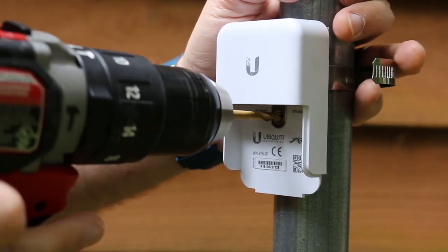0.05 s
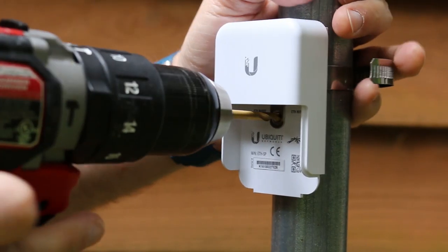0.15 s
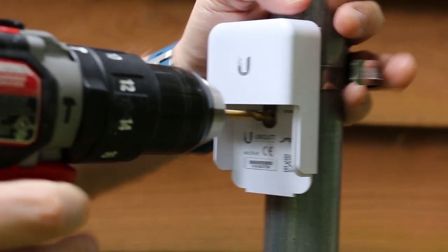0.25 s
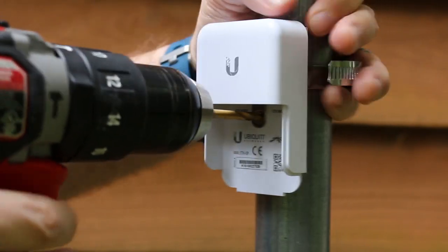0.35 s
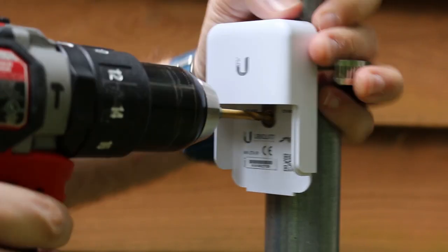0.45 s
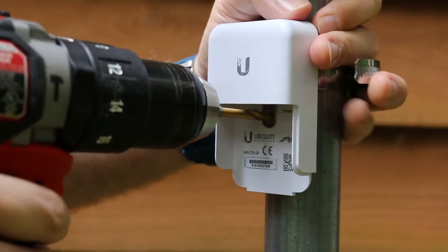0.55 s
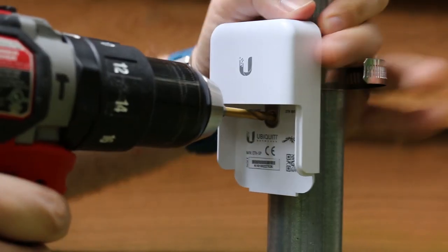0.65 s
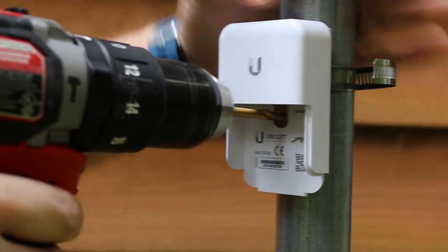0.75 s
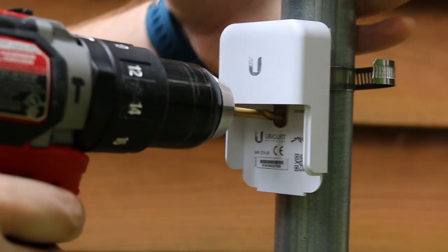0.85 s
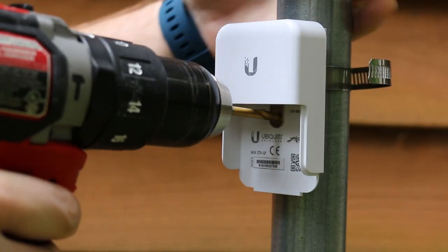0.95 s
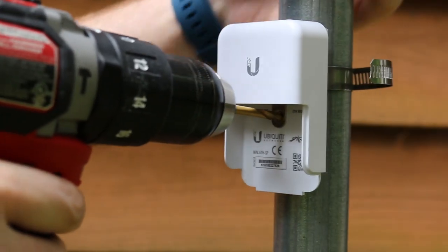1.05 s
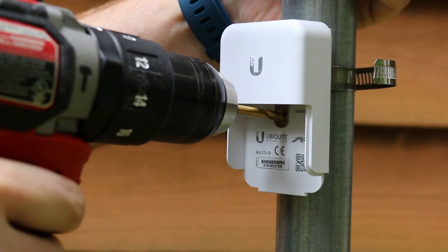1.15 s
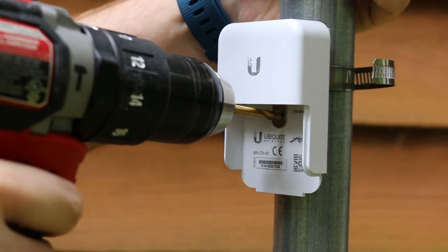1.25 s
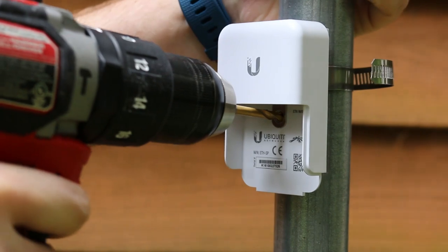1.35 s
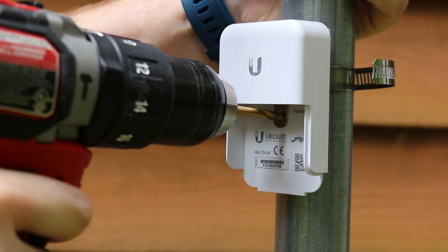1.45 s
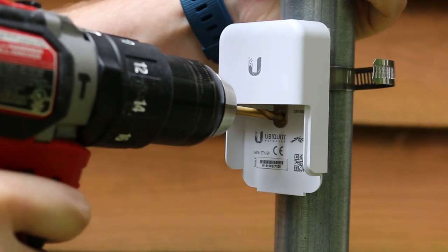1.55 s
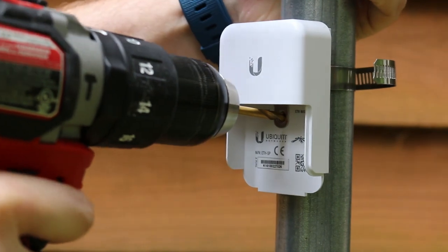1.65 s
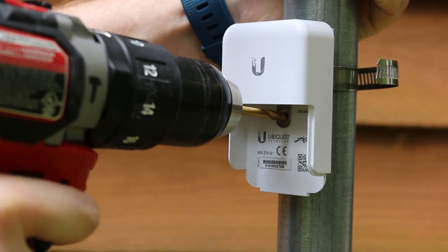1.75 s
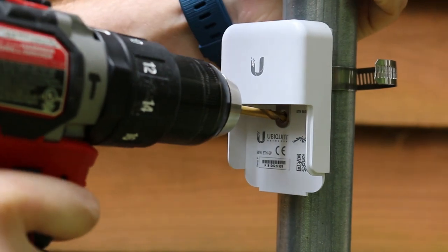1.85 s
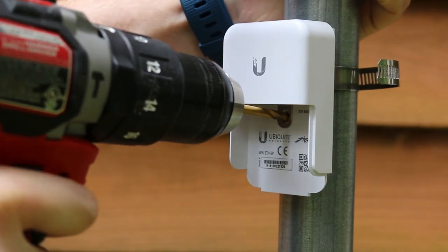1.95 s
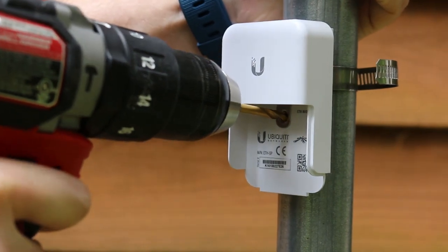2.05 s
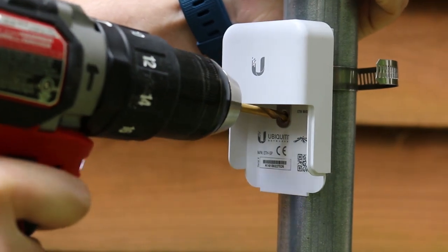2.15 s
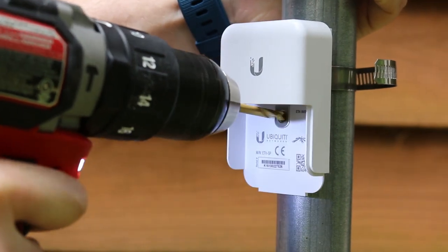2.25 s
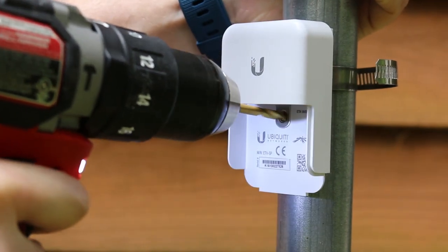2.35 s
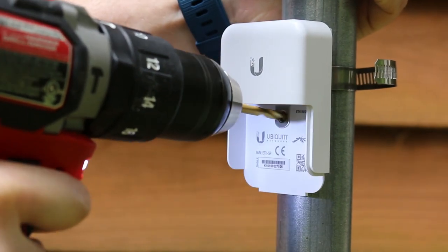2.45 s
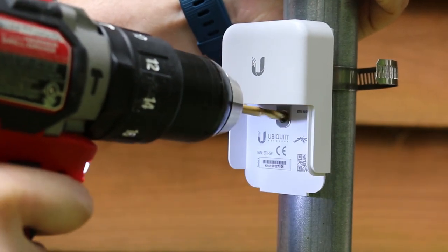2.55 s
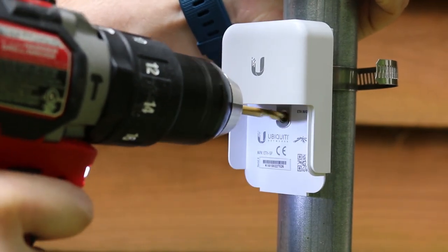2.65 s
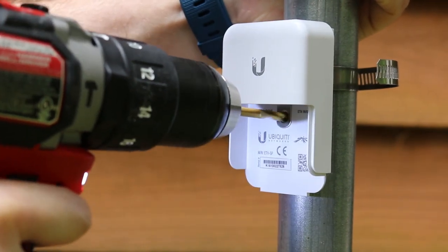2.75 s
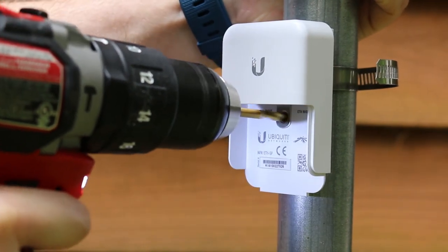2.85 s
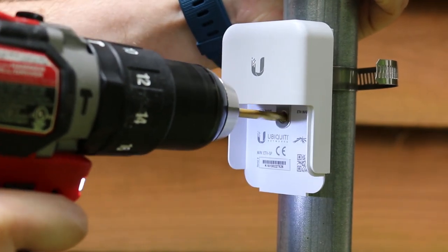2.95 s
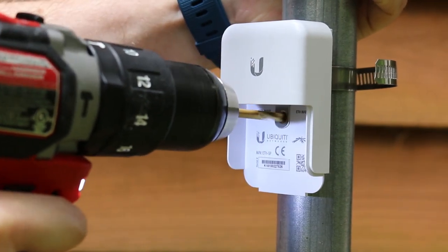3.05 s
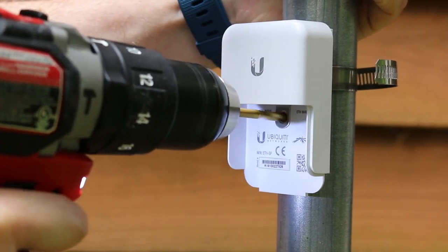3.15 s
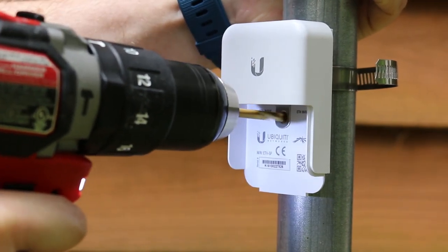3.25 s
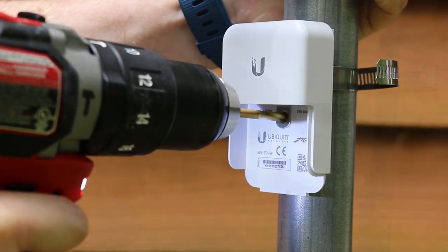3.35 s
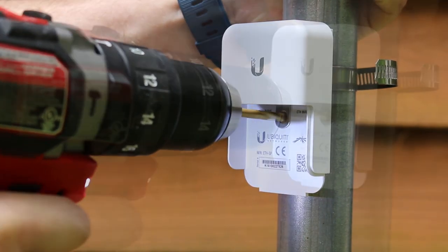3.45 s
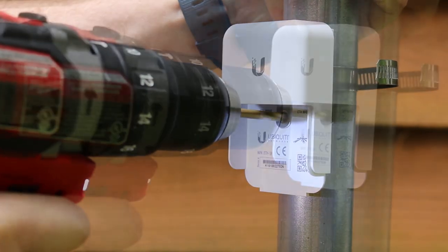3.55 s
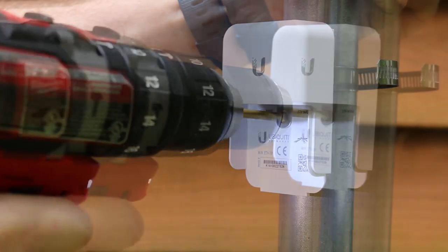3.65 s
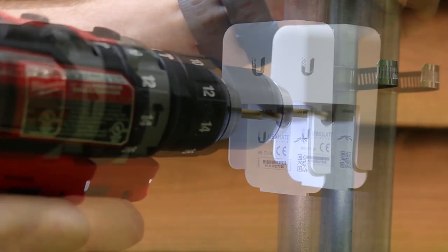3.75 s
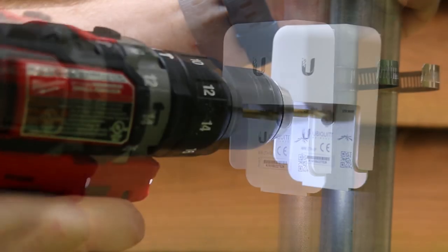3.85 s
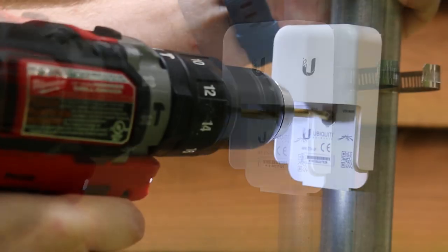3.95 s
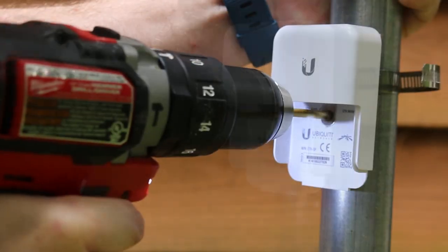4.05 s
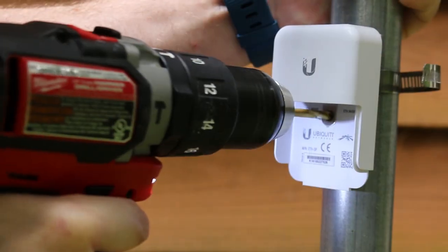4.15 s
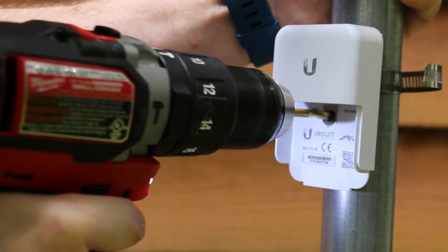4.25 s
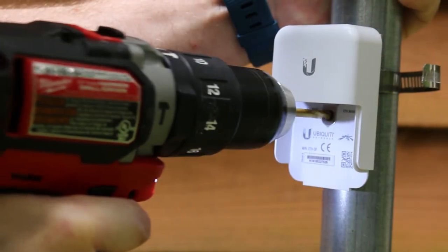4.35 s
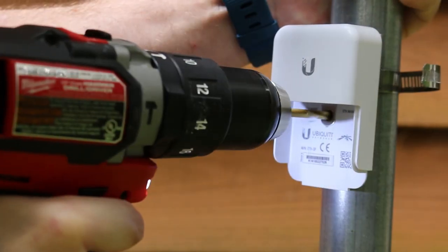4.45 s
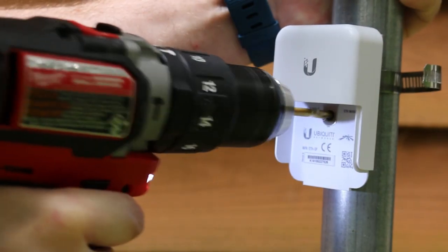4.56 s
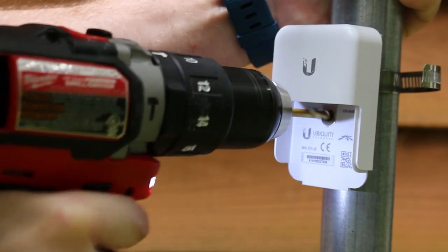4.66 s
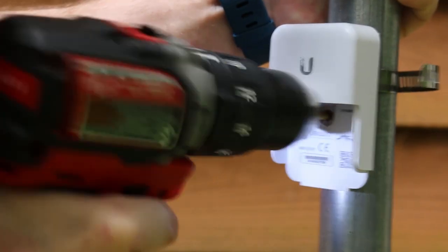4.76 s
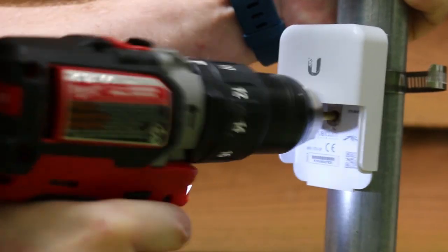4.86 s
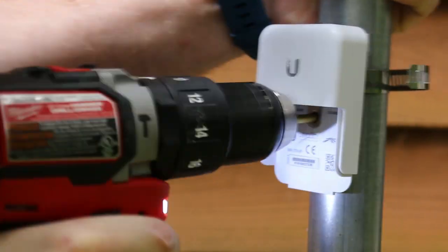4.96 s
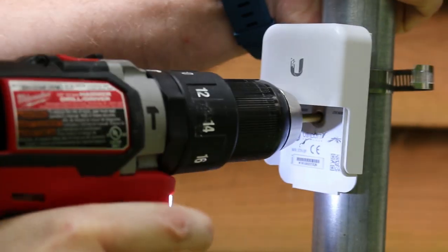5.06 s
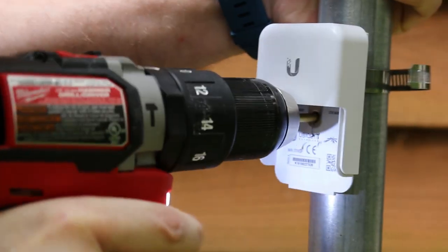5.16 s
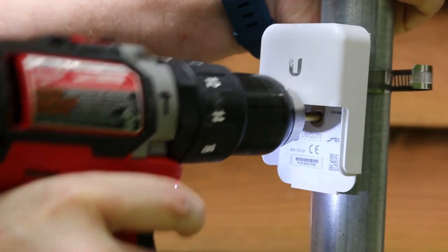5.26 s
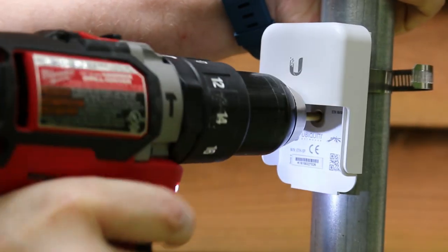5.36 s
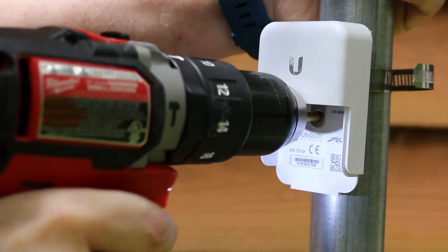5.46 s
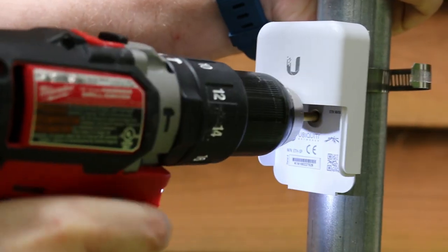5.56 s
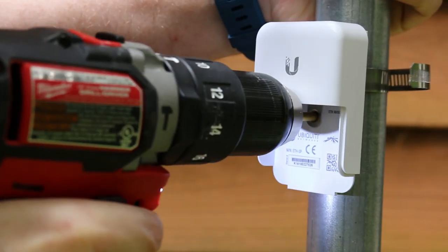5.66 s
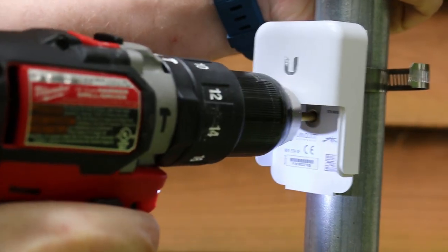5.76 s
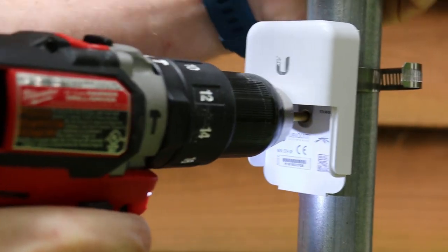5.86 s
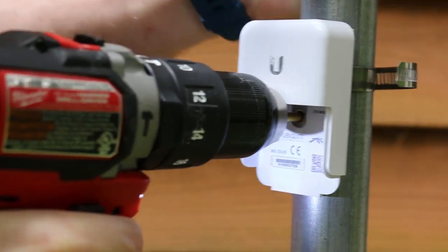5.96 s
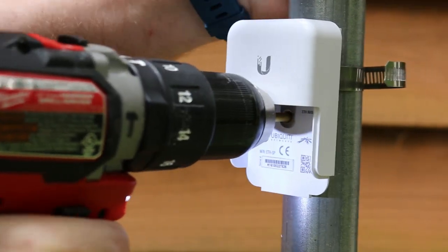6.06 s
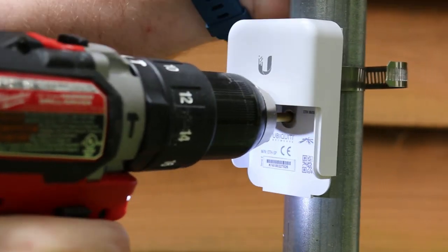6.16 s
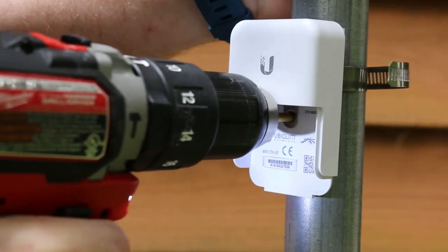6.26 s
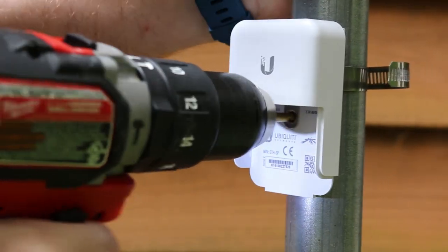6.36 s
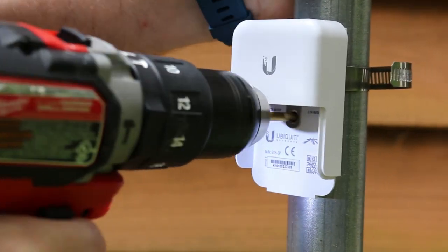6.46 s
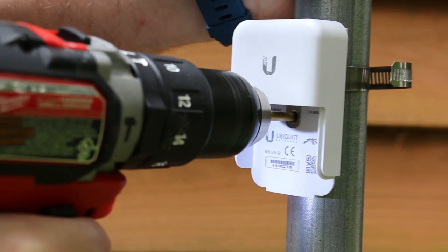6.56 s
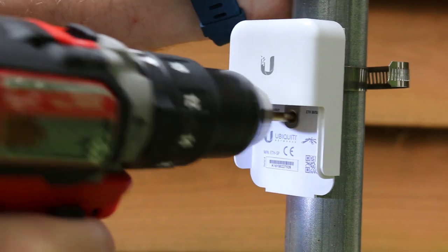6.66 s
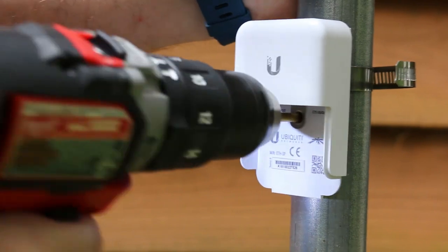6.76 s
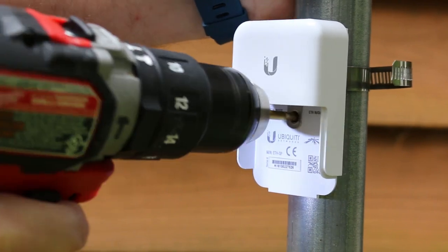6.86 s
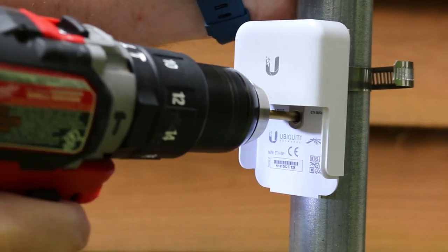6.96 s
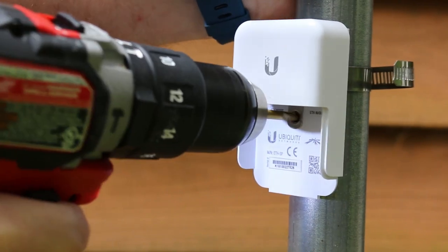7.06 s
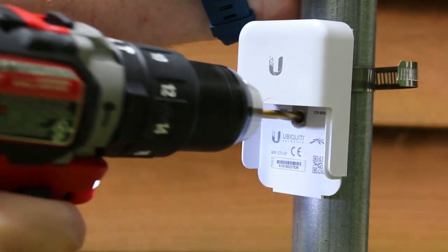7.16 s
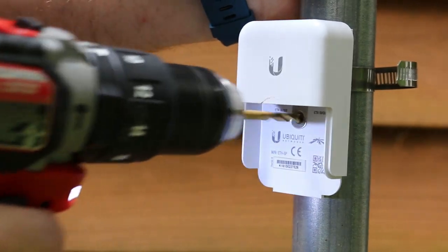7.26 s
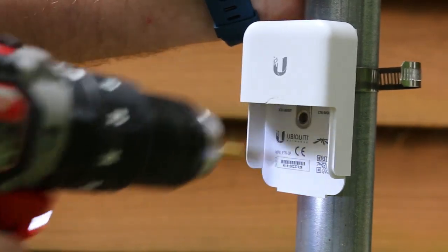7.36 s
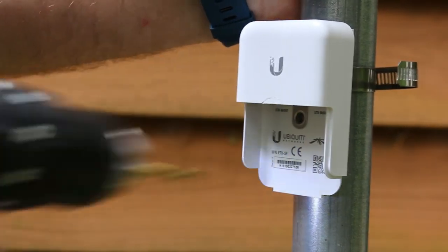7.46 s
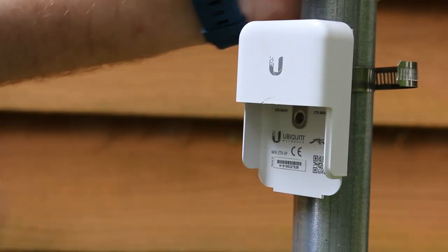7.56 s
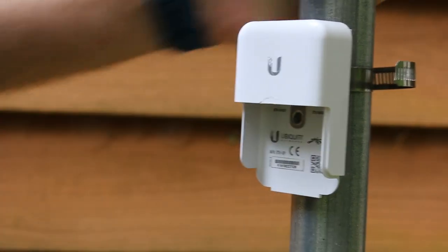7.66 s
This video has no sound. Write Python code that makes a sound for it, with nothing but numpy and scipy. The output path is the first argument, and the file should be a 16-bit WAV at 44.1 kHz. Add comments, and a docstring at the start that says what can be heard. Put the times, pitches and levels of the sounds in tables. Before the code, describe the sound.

A cordless drill bores into a steel pole twice, whining and grinding, after a metal clamp snaps against the pole.

```python
"""Outdoors at a steel pole, close up and in mono: a cordless drill bores into the metal twice.
First a hand slides along the pole and lets a hose clamp snap against it. The motor whines in the
orders of its shaft over chattering gears and the grinding bit. The first run starts on a half-pulled
trigger, with the speed controller singing; the second goes straight to full speed. Between the runs
the bit ticks and knocks in the hole, and a faint metallic ring dies away after each run stops."""
import sys
import numpy as np
from scipy import signal
from scipy.fft import rfft, irfft
from scipy.io import wavfile
from scipy.ndimage import uniform_filter1d

SR = 44100
rng = np.random.default_rng(int(sys.argv[2]) if len(sys.argv) > 2 else 0)


def to_wav(s):
    """Save 16-bit WAV."""
    ch = np.atleast_2d(s).T  # columns
    pcm = np.round(np.clip(ch, -1, 1) * 32767)  # PCM
    wavfile.write(sys.argv[1], SR, pcm.astype(np.int16))


N = 340452
TIME = np.arange(N) / SR

# noise colours of the outdoor air and of the crack of metal on metal: f/Hz, level/dB
AIR_SPECTRUM = [(20, -21.5), (100, -2.5), (140, -10), (500, -16.5), (2000, -36.5), (16000, -51)]
CRACK_SPECTRUM = [(400, -48), (850, -32), (1300, -1), (3200, 3.5), (5000, -8.5), (7000, -10.5),
                  (16000, -16)]
# fader ride on the air: t/s, level/dB
AIR_LEVEL = [(0, -65.5), (2.25, -58.5), (2.5, -74), (7.72, -73)]
# how each metal part rings: f/Hz, level/dB, t60/s
TOUCHED_POLE_MODES = [(343, 2, 0.31), (702, 3.5, 0.076), (1157, -4.5, .1), (1400, -14.5, 0.22),
                      (2474, -1, 0.53), (3330, -12, .07)]
SCREW_MODES = [(4670, -1, 0.074), (8500, -8, .025), (10150, -5, .02), (12200, 15, 0.0032)]
BIT_MODES = [(1220, -13, 0.039), (2490, -21.5, .35), (2820, 0, 0.035), (3660, -29, 0.072)]
STRUCK_POLE_MODES = [(213.7, -11, 0.05), (300, 3, 0.037), (366.6, 2, 0.2), (500, -6, 0.028),
                     (982, -9.5, 0.085), (1058, -6, 0.072), (2048, -15, 0.091), (2380, -13.5, 0.041),
                     (378, -31.5, 1.1), (1040, -32.5, .8), (2020, -34, 1.2), (2940, -29, 0.89),
                     (3140, -7.5, 0.043)]
CLAMP_MODES = [(1403, -1.5, 0.11), (1970, -26, 0.26), (2420, -15, 0.3), (2520, -14.5, 0.39),
               (3000, 6, 0.088), (3108, -21.5, 0.602), (3286, 0.5, 0.06), (3896, -11.5, 0.091),
               (5930, 4, 0.0099), (6890, 8.5, 0.028), (7060, -19, .25), (7330, 6.5, 0.023)]
# cues for the rubs and for the ring after each run: t/s, length/s, level/dB, fade/(dB/s)
HAND_RUBS = [(-0.05, 0.765, -46, -16.5)]
SCREW_RUBS = [(.29, 0.16, -46, -34), (.51, 0.09, -58, 0)]
CLAMP_RUBS = [(.825, 0.28, -37.5, -59), (1.05, 0.52, -53.5, -10), (1.5, 0.29, -62.5, -30)]
AFTER_RING = [(5.04, 1.76, -56, -10.5), (7.58, .3, -50, -30)]
# hit cues: t/s, level/dB, scrape decay/s
BIT_TICKS = [(.336, -41.5, 0.0053), (.552, -46.5, 0.004), (4.783, -12, 0.0018), (4.802, -22.5, 0.0013),
             (5.2515, -25, 0.00048), (5.345, -48, 0.02), (5.379, -41, 0.0073), (5.4055, -29, 0.0019),
             (5.4248, -25.5, 0.0011), (6.369, -20.5, 0.00096)]
POLE_KNOCKS = [(.338, -29.5, 0.02), (4.776, -23.5, 0.031), (4.835, -36, 0.061), (5.729, -21, 0.014)]
CLAMP_HITS = [(.8654, -11.5, 0.00056), (.868, -15, 0.00074), (.948, -26, 0.0096)]

# trigger pull, one curve a run: t/s, share of full speed
TRIGGER = [
    [(2.266, 0), (2.365, .575), (2.58, .62), (2.82, .623), (2.99, 1)],
    [(6.356, 0), (6.4, 1)],
]
# what the bit's drag allows at full trigger, one curve a run: t/s, speed/(turns/s)
TOP_SPEED = [
    [(3.16, 434.0), (3.76, 435.6), (3.82, 427.9), (4.598, 423.0), (4.772, 412.7), (4.806, 425.0),
     (4.93, 418.3)],
    [(6.6, 446.9), (6.69, 448.2), (6.77, 434.8), (7.44, 449.9)],
]
# the end of each run: trigger let go t/s, shaft at rest t/s
STOPS = [(4.93, 5.076), (7.45, 7.617)]
# trim on the pole's hum in each run, fainter in the second: level/dB
HUM_DB = [-0.5, -14]
# how the housing answers a torque kick, and how it radiates the whine: f/Hz, level/dB
KICK_SPECTRUM = [(1500, -26), (2300, -9), (2950, 8.5), (3700, -5.5), (5000, -11.5), (12000, -53.5)]
HOUSING_RESPONSE = [(450, -73), (680, -24.5), (1050, -26), (1750, -34.5), (2150, -37), (2550, -20),
                    (2980, -14), (3200, -24), (3350, -29), (3560, -21.5), (4200, -26.5), (4800, -34.5),
                    (5180, -38), (5400, -31), (5680, -29.5), (6300, -31)]
# partials of the whine: multiple of the shaft speed, level/dB
MOTOR_ORDERS = [(4, -4), (8, -0.5), (12, -7.5), (13, 4.5), (16, -6.5), (20, -9.5), (26, -11.5)]
# colours of pole rumble, gear chatter, grinding and swarf hiss: f/Hz, level/dB
RUMBLE_SPECTRUM = [(150, -38.5), (350, -10.5), (700, 12), (1800, -8.5)]
CHATTER_SPECTRUM = [(450, -70), (720, -14), (950, 1.5), (1250, 6.5), (1600, -2.5), (3000, -33.5)]
GRIND_SPECTRUM = [(700, -58.5), (1300, -12.5), (2600, 1), (3400, 5.5), (4200, 1), (4800, -5.5), (6800, -7),
                  (11000, -30.5)]
SWARF_SPECTRUM = [(4500, -47), (7200, 1), (8500, 2), (10600, -3), (15500, -16)]
# their balance, a row each: level/dB, change in a deep cut/dB, change per halving of speed/dB
TEXTURE_MIX = [(-57.5, 13.5, 1), (-27, -7, -3.5), (-23, 1, -2), (-31.5, 1.5, -4.5)]
# the pole's resonances in the range of the shaft speed: f/Hz, level/dB
POLE_HUM = [(320, -79.5), (366, -44.5), (395, -57.5), (427, -74), (435, -47), (442, -64.5)]
# the bit's bending mode: f/Hz, width/Hz
BIT_BENDING = (1353, 280)

BITE_SPEED, BITE_RANGE = 431, 6  # turns/s: the cut turns deep as drag pulls the shaft through here
HARD_CHANGE = 2000  # turns/s gained or lost per second at full strain


def gain_of(db):
    """Decibels to a factor."""
    return 10 ** (np.asarray(db) / 20)


def unit_rms(x):
    """Scales to an rms of one."""
    return x / np.sqrt(np.mean(x ** 2) + 1e-20)


def db_at(spectrum, hz):
    """Reads a spectrum on a log-frequency axis."""
    f, db = np.transpose(spectrum)
    return np.interp(np.log(hz + 1), np.log(f + 1), db)


def coloured(x, spectrum):
    """Minimum-phase EQ, so that clicks keep their sharp fronts."""
    log_gain = np.log(gain_of(db_at(spectrum, np.fft.rfftfreq(4096, 1 / SR))))
    mirrored = np.concatenate([log_gain, log_gain[-2:0:-1]])
    taps = np.fft.ifft(np.exp(np.conj(signal.hilbert(mirrored)))).real[:len(mirrored) // 2]
    return signal.oaconvolve(x, taps / np.linalg.norm(taps))[:len(x)]


def low_cut(x, hz, order):
    """Rolls off the bass."""
    return signal.sosfilt(signal.butter(order, hz, "high", fs=SR, output="sos"), x)


def wander(size, hz):
    """Random drift slower than about hz, with an rms of one."""
    f = np.fft.rfftfreq(size, 1 / SR)
    return unit_rms(irfft(rfft(rng.standard_normal(size)) / (1 + (f / hz) ** 4), size))


def grains(size, per_s, spread_db):
    """Random clicks of uneven size."""
    sizes = gain_of(spread_db * np.minimum(rng.exponential(1, size), 4))
    return unit_rms(sizes * rng.choice([-1, 1], size) * (rng.random(size) < per_s / SR))


def gate(t, start, end, attack_s, release_s):
    """Attack, hold, release."""
    return np.clip((t - start) / attack_s, 0, 1) * np.clip((end - t) / release_s, 0, 1)


def add(mix, start, sound):
    """Lays a sound into the mix at start seconds."""
    part = mix[max(round(start * SR), 0):][:len(sound)]
    part += sound[:len(part)]


def air():
    """A faint, dark bed of outdoor air."""
    level_db = np.interp(TIME, *np.transpose(AIR_LEVEL))
    return coloured(rng.standard_normal(N), AIR_SPECTRUM) * gain_of(level_db)


def metal_ring(modes, crack_db, crack_t60, low_cut_hz):
    """A metal part answers one tap with its modes and a short crack; its size limits the bass."""
    t = np.arange(SR) / SR
    ring = sum(gain_of(db - 60 * t / t60) * np.sin(2 * np.pi * hz * t) * (-1) ** k
               for k, (hz, db, t60) in enumerate(modes))
    crack = coloured(rng.standard_normal(SR) * gain_of(crack_db - 60 * t / crack_t60), CRACK_SPECTRUM)
    return low_cut(ring + crack, low_cut_hz, order=2)


def sustained(cues, ring, uneven_db=2):
    """A stream of tiny uneven clicks keeps a part ringing softly; each cue fades at its own rate."""
    clicks = grains(N + len(ring) - 1, per_s=9000, spread_db=3)
    envelope = np.zeros(N)
    for start, length, db, fade in cues:
        window = gate(TIME, start, start + length, attack_s=0.047, release_s=0.12)
        envelope += window * gain_of(db + fade * np.clip(TIME - start, 0, length))
    ringing = unit_rms(signal.oaconvolve(clicks, ring, "valid"))
    return envelope * gain_of(uneven_db * wander(N, 20)) * ringing


def hand_slide():
    """The tiny slips of a lightly sliding hand set the pole ringing freely."""
    ring = metal_ring(TOUCHED_POLE_MODES, crack_db=1.5, crack_t60=0.023, low_cut_hz=150)
    return sustained(HAND_RUBS, ring)


def screw_scrape():
    """Two thin, bright rubs on the clamp's screw housing."""
    return sustained(SCREW_RUBS, metal_ring(SCREW_MODES, crack_db=3, crack_t60=0.02, low_cut_hz=1900))


def hits(cues, ring, rattle=0.077, rise_share=0.71):
    """Each hit is a tap inside a short scrape; the struck part rings."""
    out = np.zeros(N)
    t = np.arange(-SR // 10, SR // 5) / SR
    for tap_time, db, decay in cues:
        scrape = np.exp(-np.where(t < 0, -t / rise_share, t) / decay)
        force = (t == 0) + rattle * scrape * rng.standard_normal(len(t))
        sound = signal.fftconvolve(force, ring)
        loudest_rms = np.sqrt(uniform_filter1d(sound ** 2, size=220).max())
        add(out, tap_time + t[0], gain_of(db) * sound / loudest_rms)
    return out


def bit_ticks():
    """The bit ticks sharply against the steel."""
    return hits(BIT_TICKS, metal_ring(BIT_MODES, crack_db=13.5, crack_t60=0.035, low_cut_hz=880))


def pole_knocks():
    """The struck pole gives a hollow knock with a faint, long tail."""
    ring = metal_ring(STRUCK_POLE_MODES, crack_db=-17.5, crack_t60=0.018, low_cut_hz=150)
    return hits(POLE_KNOCKS, ring)


def clamp_snap():
    """The hose clamp snaps against the pole and rubs on, ringing."""
    ring = metal_ring(CLAMP_MODES, crack_db=9, crack_t60=0.038, low_cut_hz=1100)
    return hits(CLAMP_HITS, ring) + sustained(CLAMP_RUBS, ring)


def shaft_speed(t, trigger, top_speed, let_go, at_rest, lag_s=0.032, waver=0.0015):
    """Turns per second: the shaft lags behind the trigger until the brake grips, ever harder."""
    inertia = np.exp(-1 / (lag_s * SR))
    drive = signal.lfilter([1 - inertia], [1, -inertia], trigger)
    braking = np.clip((t - let_go) / (at_rest - let_go), 0, 1) ** 2.2
    speed = np.maximum(top_speed * drive * (1 - braking), 1)
    return speed * (1 + waver * wander(len(t), 9))


def torque_kicks(speed, turns, weak=0.12, gear_play=0.3, blur_speed=220):
    """Twelve commutations a turn jolt the housing, every third hardest; gear play makes them uneven."""
    step = np.floor(12 * turns)
    jolts = np.where(step % 3 == 0, 1, weak) * np.diff(step, prepend=0)
    jolts *= 1 + gear_play * rng.standard_normal(len(jolts))
    kicks = coloured(jolts * np.sqrt(SR / (4 * np.maximum(speed, 20))), KICK_SPECTRUM)
    return kicks * np.minimum(blur_speed / speed, 1) ** 2  # the rotor's mass smooths them away at speed


def controller_tone(t, trigger, speed, turns, switching_hz=9810):
    """The switching tone, split into side tones by the passing magnets; it ends at full trigger."""
    carrier, magnets = 2 * np.pi * switching_hz * t, 8 * np.pi * turns
    rolling = np.clip(speed / 250, 0, 1)
    sides = gain_of(-4) * np.sin(carrier - magnets) + gain_of(-19) * np.sin(carrier + 2 * magnets)
    envelope = gain_of(-19 - 0.025 * speed) * np.sqrt(2 * (1 - trigger))
    return envelope * (np.sin(carrier + magnets) + rolling * sides)


def motor_whine(speed, turns, strain, flutter_db=1, lash_db=3, jitter_turns=0.0047, fade_speed=248):
    """Shaft orders swell as they sweep through the resonances of the housing."""
    size = len(speed)
    shaken = turns + jitter_turns * wander(size, 25)  # the cutting edges tug at the shaft
    out = np.zeros(size)
    for order, db in MOTOR_ORDERS:
        flicker_db = (flutter_db + lash_db * strain) * wander(size, 41)
        strength = gain_of(db + db_at(HOUSING_RESPONSE, order * speed) + flicker_db)
        meshing = 1 if order % 2 == 0 else 1 - strain  # the gear mesh loses its tone under strain
        out += meshing * strength * np.sin(2 * np.pi * order * shaken)
    return np.sqrt(2) * out * np.minimum(speed / fade_speed, 1) ** 2


def cutting_textures(turns, depth, halvings, tooth_depth=0.052, bite_db=1):
    """Pole rumble, gear chatter, grinding and swarf hiss: four streams of tiny impacts."""
    size = len(turns)
    # the planet gears rattle in step with their carrier, and the bit bites unevenly
    teeth = 1 + tooth_depth * np.cos(2 * np.pi * 0.4 * turns + wander(size, 37))
    bite = teeth * gain_of(bite_db * wander(size, 22))
    rumble = coloured(grains(size, per_s=3500, spread_db=2.5), RUMBLE_SPECTRUM)
    chatter = coloured(grains(size, per_s=5000, spread_db=1.7) * bite, CHATTER_SPECTRUM)
    grind = coloured(grains(size, per_s=14000, spread_db=1.9) * bite, GRIND_SPECTRUM)
    swarf = coloured(grains(size, per_s=16000, spread_db=1.9) * bite, SWARF_SPECTRUM)
    return [layer * gain_of(db + deep_db * depth + slow_db * halvings)
            for layer, (db, deep_db, slow_db) in zip((rumble, chatter, grind, swarf), TEXTURE_MIX)]


def pole_hum(speed, turns, waver_db=2):
    """The shaft's unbalance shakes the pole once a turn; it hums where that meets a resonance."""
    level_db = db_at(POLE_HUM, speed) + waver_db * wander(len(speed), 12)
    return np.sqrt(2) * gain_of(level_db) * np.sin(2 * np.pi * turns)


def bit_song(depth, level_db=-26.5):
    """A deep cut keeps the bending mode of the bit ringing."""
    hz, width_hz = BIT_BENDING
    b, a = signal.iirpeak(hz, hz / width_hz, fs=SR)
    ringing = signal.lfilter(b, a, signal.lfilter(b, a, rng.standard_normal(len(depth))))
    return gain_of(level_db) * depth * unit_rms(ringing)


def drill_run(trigger_curve, top_speed_curve, stop, hum_db):
    """One run, every layer played by the trigger and the bit's drag; returns its start and sound."""
    start = trigger_curve[0][0]
    let_go, at_rest = stop
    t = np.arange(start, at_rest, 1 / SR)
    trigger = np.interp(t, *np.transpose(trigger_curve))
    top_speed = np.interp(t, *np.transpose(top_speed_curve))
    speed = shaft_speed(t, trigger, top_speed, let_go, at_rest)
    turns = np.cumsum(speed) / SR
    depth = np.clip(0.5 + (BITE_SPEED - top_speed) / BITE_RANGE, 0, 1) * (speed / top_speed) ** 2
    acceleration = np.gradient(speed) * SR / HARD_CHANGE
    strain = np.minimum(abs(acceleration), 1) ** 3  # any sudden change of speed
    surge = np.clip(acceleration, 0, 1) ** 2  # speeding up only
    torque = np.sqrt(strain) * np.maximum(acceleration, 1) ** 0.35

    kick_db = np.where(t < let_go, -17.5, -23.5)  # softer on the brake
    kicks = torque * gain_of(kick_db) * torque_kicks(speed, turns)
    tones = controller_tone(t, trigger, speed, turns)
    tones += gain_of(0.5 - 2 * depth - 6 * surge) * motor_whine(speed, turns, strain)
    rumble, chatter, grind, swarf = cutting_textures(turns, depth, halvings=np.log2(top_speed / speed))
    grind *= gain_of(6.5 * surge - 4 * strain)
    grit = low_cut(chatter + grind + swarf + kicks, hz=700, order=3)  # small parts radiate no bass
    tones += gain_of(hum_db) * pole_hum(speed, turns) + bit_song(depth)
    envelope = gate(t, start, at_rest, attack_s=0.014, release_s=0.023) ** 2
    return start, envelope * (grit + rumble + tones)


def after_ring():
    """A faint metallic ring dies away after each run stops."""
    return sustained(AFTER_RING, metal_ring(BIT_MODES, crack_db=-9, crack_t60=0.09, low_cut_hz=590))


def scene():
    """The air, the handled metal and the drill, alike in both channels."""
    mix = air() + hand_slide() + screw_scrape() + bit_ticks() + pole_knocks() + clamp_snap()
    for run in zip(TRIGGER, TOP_SPEED, STOPS, HUM_DB):
        add(mix, *drill_run(*run))
    mix += after_ring()
    return np.array([mix, mix])


def record(dry):
    """Peaks clip at full scale, then a steep high cut at 15.9 kHz trims the top."""
    lowpass = signal.firwin(401, 15900, window=("kaiser", 8), fs=SR)
    return signal.oaconvolve(np.clip(dry, -1, 1), lowpass[None], "same")


dry = scene()
out = record(dry)
to_wav(out)
```